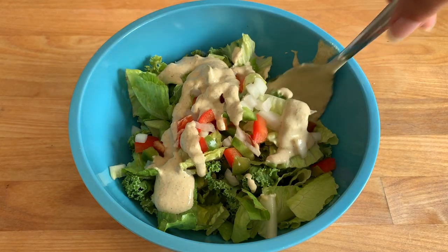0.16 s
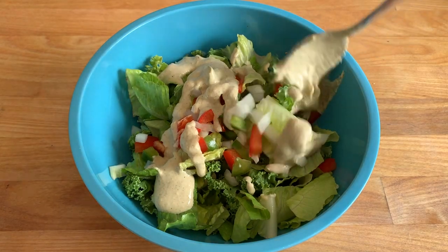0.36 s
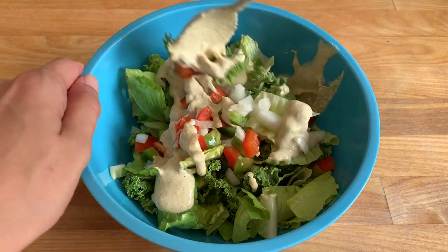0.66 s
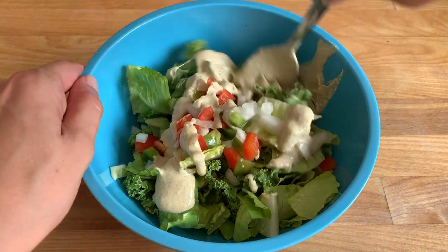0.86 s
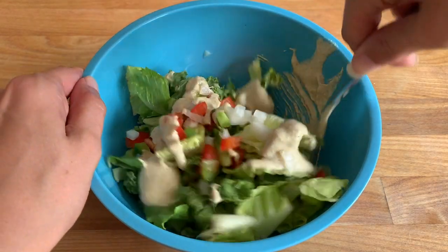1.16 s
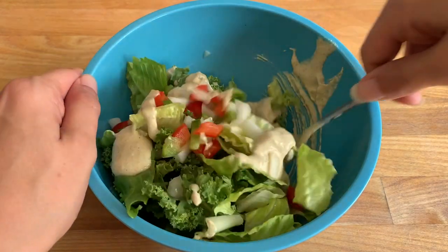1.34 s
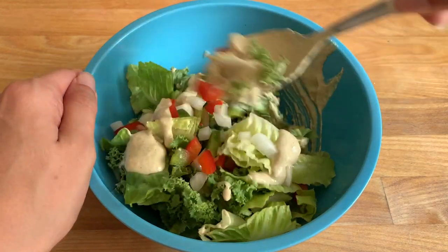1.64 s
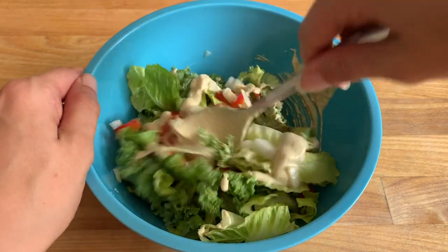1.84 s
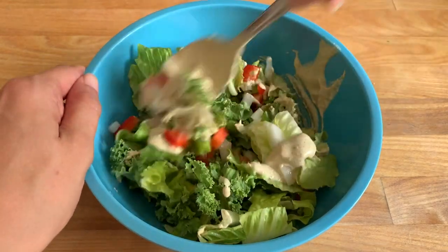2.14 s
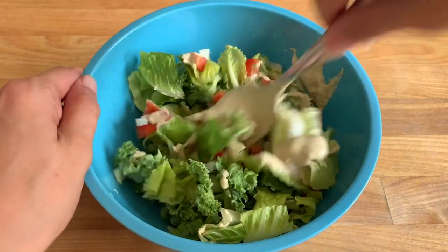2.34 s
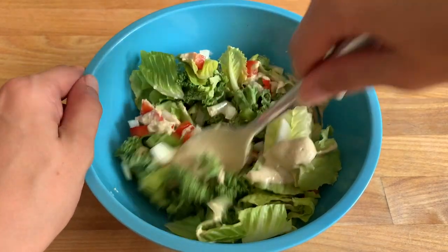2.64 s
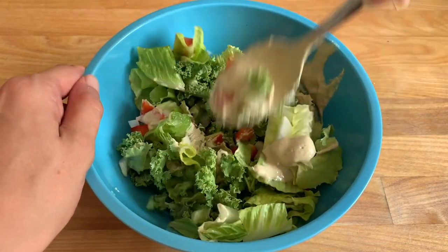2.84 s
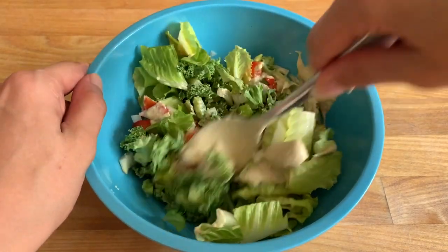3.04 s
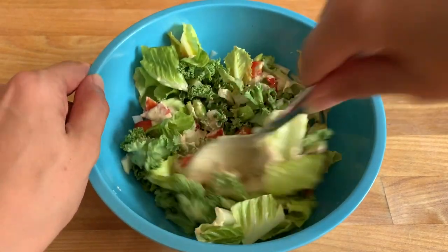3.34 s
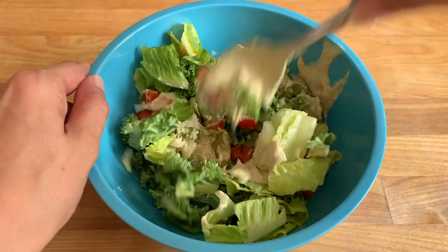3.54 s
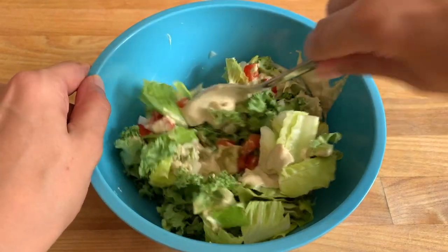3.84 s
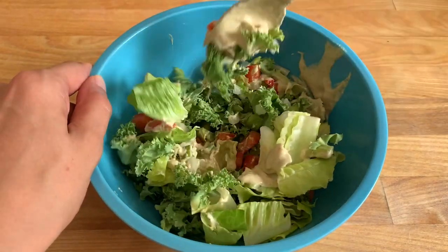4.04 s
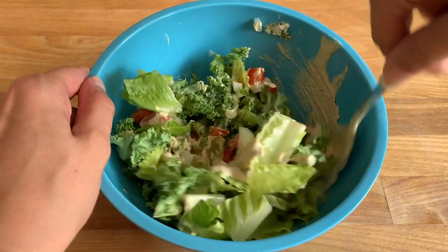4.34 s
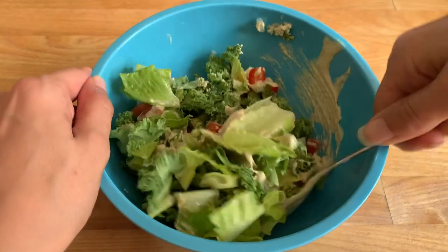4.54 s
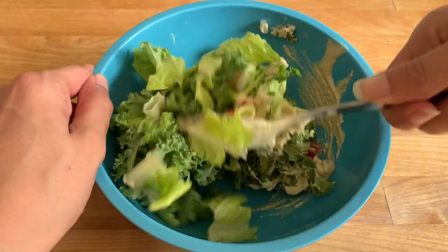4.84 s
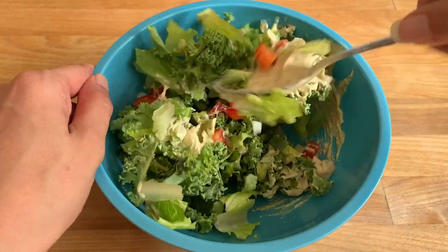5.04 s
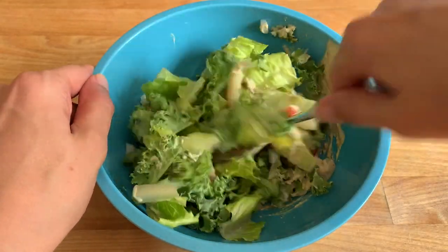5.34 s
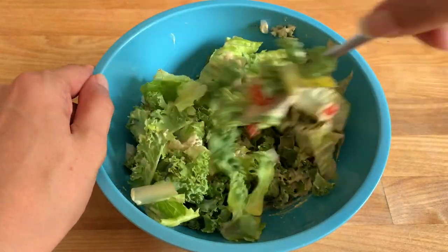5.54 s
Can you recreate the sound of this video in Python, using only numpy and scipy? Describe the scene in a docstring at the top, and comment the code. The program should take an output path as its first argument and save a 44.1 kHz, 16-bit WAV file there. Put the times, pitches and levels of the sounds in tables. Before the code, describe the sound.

After a soft, nearly still start, strokes of a metal utensil push wet leaves around a plastic bowl, each a crisp hiss that swells and stops quickly. Tiny squelches, dry snaps, short scrapes and hollow ticks accompany them. The bowl knocks woodenly on the counter, then hard clacks cut through late. Two close microphones capture it in a small quiet indoor room with low hum.

```python
"""A low thump of a wooden counter and faint taps of metal come first, then the hiss of stirred salad leaves.
Friction noise makes the hiss, short resonant bursts the snaps of stems and the pops of thick dressing.
A metal utensil scrapes and taps a plastic bowl, exciting its decaying modes, and drags out one brief squeak.
The bowl knocks on the wood and the counter thumps as damped oscillators; a quiet room hums behind.
Two closely placed microphone ports hear it all with a small phase lag."""
import sys
import numpy as np
from scipy import signal
from scipy.fft import rfft, irfft, next_fast_len
from scipy.io import wavfile
from scipy.ndimage import uniform_filter1d

SR = 44100
rng = np.random.default_rng(int(sys.argv[2]) if len(sys.argv) > 2 else 0)


def dump(signal):
    """Clip the signal to [-1, 1] and save it as 16-bit WAV at the path in sys.argv[1]."""
    limited = np.clip(np.atleast_2d(signal).T, -1, 1)
    pcm = np.round(limited * 32767).astype(np.int16)
    wavfile.write(sys.argv[1], SR, pcm)


N = 250973

# Strokes through the leaves: peak t/s, rise time/s, peak level/dB, hold time/s,
# level at the end of the hold/dB, dullness/dB (extra level below about 3 kHz)
STIR_STROKES = [(0.026, 0.034, -43.5, 0.029, -55, 8), (0.092, 0.068, -50.5, 0.073, -53, 7),
                (0.203, 0.092, -43.5, 0.097, -52, 0.5), (0.334, 0.1, -40.5, 0.013, -51, 0),
                (0.453, 0.18, -41.5, 0.061, -46, 4.5), (0.598, 0.098, -41, 0.18, -50, 3.5),
                (0.805, 0.086, -29.5, 0.39, -34, -0.5), (1.207, 0.19, -26.5, 0.093, -29, -5),
                (1.416, 0.16, -37.5, 0.21, -41.5, 0), (1.881, 0.11, -25, 0.18, -35, -0.5),
                (2.163, 0.11, -47.5, 0.037, -54, 7), (2.293, 0.11, -26, 0.13, -35.5, -1.5),
                (2.51, 0.06, -52, 0.038, -58, 7), (2.638, 0.12, -27.5, 0.13, -32.5, -2),
                (2.88, 0.065, -57.5, 0.07, -56, 22), (3.018, 0.14, -26.5, 0.17, -37.5, -2.5),
                (3.38, 0.09, -25.5, 0.13, -30.5, -2.5), (3.794, 0.076, -23, 0.24, -38.5, -2.5),
                (4.179, 0.052, -35.5, 0.29, -32.5, -0.5), (4.547, 0.049, -25, 0.091, -41.5, 6.5),
                (4.66, 0.064, -36, 0.22, -42, 3.5), (4.914, 0.033, -37, 0.072, -38.5, 2),
                (5.016, 0.012, -22, 0.19, -47, -3.5), (5.204, 0.086, -44.5, 0.075, -35.5, 3),
                (5.325, 0.1, -22.5, 0.16, -39.5, -0.5), (5.585, 0.11, -49.5, 0.079, -50.5, 12)]
# Spectrum of the leaf friction: f/Hz, relative density level/dB per Hz
LEAF_SPECTRUM = [(300, -43), (700, -22.5), (1400, 2.5), (2500, -4), (3800, 2.5), (6000, 4.5), (7500, -3),
                 (9500, -0.5), (15000, -4.5)]
# Snaps of stems and dressing: t/s, peak level/dB, centre f/Hz, t60/ms
STEM_SNAPS = [(0.1853, -25.5, 3700, 10), (0.293, -31.5, 6000, 8.6), (.6265, -30.5, 6400, 8),
              (.7783, -27, 7960, 14), (.8004, -34, 5860, 11), (.83, -26, 4470, 6), (.856, -16.5, 3850, 14),
              (.884, -18, 5000, 18), (.904, -23, 6500, 7), (.921, -21, 4000, 11), (.933, -29, 4500, 7.3),
              (1.037, -13.5, 8900, 9.7), (1.079, -30, 6000, 7.2), (1.1044, -18, 9050, 8),
              (1.1837, -24, 5200, 13), (1.408, -19.5, 5860, 19), (1.713, -38, 3750, 47),
              (1.952, -29, 6000, 9), (2.2752, -17, 5340, 8), (2.5711, -32, 2980, 11),
              (2.6489, -14, 6100, 9), (2.6923, -18, 6100, 11), (2.8773, -30, 5260, 19),
              (3.0006, -15, 6500, 14), (3.3737, -33, 6000, 9), (3.388, -30, 6000, 7.4),
              (3.774, -19, 5940, 9.2), (3.887, -13, 9050, 6.5), (3.9466, -14, 9500, 15),
              (4.1679, -24, 9800, 7.5), (4.2497, -25, 3500, 14), (4.2906, -18.5, 3560, 20),
              (4.3582, -6, 10000, 6), (4.3584, -5.5, 4160, 13), (4.4278, -15.5, 5500, 20),
              (4.501, -21, 9400, 21), (4.531, -22, 5000, 25), (4.541, 4.5, 5300, 12),
              (4.707, -23, 4830, 18), (4.74, -19, 3470, 9), (4.808, -25, 5000, 7), (4.91, -21, 5330, 26),
              (5.0087, -3.5, 8700, 5.6), (5.331, -9.5, 7600, 8.9), (5.589, -30.5, 5300, 17),
              (5.656, -37, 9000, 9)]
# Modes of the bowl wall: f/Hz, relative level/dB, free t60/s
WALL_MODES = [(900, -20, 0.032), (970, -13.5, 0.013), (1420, -16, 0.015), (1875, -10, 0.021),
              (2006, -2, 0.033), (2120, -25, 0.048), (2276, -39, 0.057), (2460, -29, 0.011),
              (2820, -26, 0.02), (3484, -5.5, 0.014), (3585, -25, 0.04), (3750, -19, 0.046),
              (4240, -24.5, 0.034)]
# The metal edge drags along the wall: start t/s, length/s, level/dB, lift of the upper modes/dB
EDGE_SCRAPES = [(0, 0.061, -53, -2), (0.965, 0.053, -43, 2), (1.065, 0.073, -46, -3),
                (1.141, 0.022, -34.5, -1), (1.272, 0.0083, -25.5, 4.5), (1.383, 0.024, -42, -7),
                (1.863, 0.13, -41, 1), (2.3, 0.074, -46, -13), (2.672, 0.13, -42.5, -2.5),
                (3.48, 0.087, -50, 1), (3.856, 0.076, -39.5, 3), (4.447, 0.14, -42, -13),
                (4.813, 0.12, -43, -13), (5.303, 0.093, -37, 2)]
# Metal taps the wall: t/s, peak level/dB, main ring f/Hz, lift of the lower, side and upper modes/dB each,
# contact time/ms, ring length/share of the free t60
METAL_TAPS = [(0.024, -30.5, 2195, 16, 18, -9, 3.6, 0.86), (.048, -42, 2260, 8, 5, -3, 5.4, 1),
              (.088, -38, 1970, 12, 5, 8, 3.3, 1), (1.162, -22.5, 2000, 3, -4, -7, 2.2, 1),
              (1.192, -18, 2016, -5, -4, -10, 3.9, 0.91), (1.263, -17, 2170, 3, 5, 18, 2.8, 0.76),
              (1.270, -8, 2163, -7, 5, 11, 3.33, 0.62), (1.280, -12, 2150, 14, 5, 26, 1.65, 0.64),
              (1.291, -7.5, 2094, -2, 11, 8.5, 3.6, 0.57), (1.297, -13, 2200, 5, 5, 12, 2, .5),
              (1.307, -35, 2180, 5, 4, -4, 2.5, .8), (1.412, -25, 2010, -1, -1, -2, 2.4, 1),
              (1.559, -23.5, 1990, 3, -2, 3.5, 2, 1), (2.298, -24.5, 2010, -2, 8, 5, 2.2, 1),
              (2.707, -30, 1960, -2, 0, -2, 1.56, 0.88), (3.097, -21.5, 2030, 16, 17, -5, 2.1, 0.91),
              (3.3884, -16, 1965, 1, 9, -15, 1.4, 0.56), (3.5214, -23.5, 2020, -2, -3, -7, 2, 0.91),
              (3.84, -32, 1945, 0, -11, -13, 3.2, 1), (3.86, -17.5, 2090, -3, -2, 10, 2.5, 0.65),
              (3.885, -25, 1940, -6, -11, -3, 3.8, 1), (3.983, -28, 1990, 2, 1, -5, 4.3, 1),
              (4.427, -27.5, 2000, 11, 13, -1, 1.1, 0.87), (4.5412, -0.5, 2032, 2.5, 21.5, -13, 1.79, 0.61),
              (4.592, -24, 2024, 1, 3, -8, 4, 0.74), (4.74, -1, 2002, -6, 1, -8.5, 1.09, 1),
              (4.765, -11.5, 1973, -1, -9, -16, 1, 0.97), (4.778, -19, 1970, -5, -9, -14, 2.6, 1),
              (4.808, -24.5, 2010, 12, 18, -3, 1.6, 0.91), (4.8589, -21, 1974, 6, -7, -7, 2.1, 0.57),
              (5.312, -41, 2000, -3, 3, 10, 3.1, .7), (5.326, -21, 1940, 10, 0, 3, 2.5, 0.47),
              (5.372, -31, 1980, -5, 5, 12, 2.6, 0.49), (5.406, -23.5, 1940, -9, 0, -8, 3, .7),
              (5.503, -31.5, 2010, 2, 7, -1, 2, 1)]
# Metal on wet plastic: t/s, peak level/dB, start f/Hz, end f/Hz, length/s
WET_SQUEAK = (3.8505, -12, 11800, 10600, .0105)
# Modes of the bowl on the wood: f/Hz, relative level/dB, t60/s
BASE_MODES = [(206.7, 3.5, 0.028), (245.7, -8.5, 0.041), (295, -3, 0.029), (387, -2, 0.023),
              (490, -5, 0.024), (588, -12, .025), (703, -11, 0.029), (837, 0, 0.018), (954, -10.5, 0.023),
              (1044, -21.5, 0.032), (1330, -35, 0.039), (1376, -27.5, 0.028)]
# The bowl knocks on the wood: t/s, peak level/dB, favoured f/Hz, fall away from it/dB per octave squared,
# contact time/ms
BOWL_KNOCKS = [(.026, -39.5, 940, 14, 3.3), (0.665, -36, 800, 13, 1.8), (2.495, -16, 800, 11, 0.6),
               (2.707, -16, 345, 3.5, 2.6), (3.096, -2.5, 436, 1, 4.8), (3.486, -16.5, 400, 5.5, 0.97),
               (4.168, -6, 350, 6, 3.1), (4.196, -24, 300, 2, 3), (4.541, -8.5, 490, 10, 1),
               (5.007, -26.5, 490, 7, 2.4)]
# The counter thumps under the hands: t/s, peak level/dB, f/Hz, t60/ms
COUNTER_THUMPS = [(.004, -25, 54, 500), (0.362, -24, 90.3, 120), (0.385, -18, 74.3, 150),
                  (0.44, -26.5, 54.7, 300), (0.771, -37, 63, 250), (1.199, -31.5, 54, 240),
                  (1.649, -25, 49.6, 400), (2.1, -18.5, 52.4, 450), (2.693, -26, 48, 230),
                  (3.107, -25.5, 88, 530), (3.222, -22, 51.2, 360), (3.485, -27.5, 85, 190),
                  (3.879, -28, 53.2, 490), (4.174, -20.5, 90.2, 330), (4.562, -32, 60.4, 360),
                  (5.021, -24, 93, 140), (5.07, -32, 46, 170)]
# Spectrum of the room noise: f/Hz, relative density level/dB per Hz
ROOM_SPECTRUM = [(20, -43), (45, -4.5), (80, -5.5), (200, -3.5), (500, -8), (700, -20), (1300, -23),
                 (1800, -38), (5000, -47), (16000, -82)]
# Appliance tones: f/Hz, steady level/dB, waver bandwidth/Hz, waver level/dB
APPLIANCE_TONES = [(92.8, -46, 3.2, -57), (118.4, -46, 8.9, -67), (163.7, -49.5, 9.2, -42),
                   (289.8, -51, 18.5, -46.5)]
# Decay of the reflections: f/Hz, t60/s
ECHO_DECAY = [(200, 0.29), (600, 0.36), (1000, 0.29), (4000, 0.035), (12000, 0.095)]
# Phase between the ports: f/Hz, lead of the left/rad
PORT_LEAD = [(0, 0), (2000, .8), (3700, 1.6), (4750, 3.14), (8950, 9.42), (13200, 15.7), (17000, 21.3)]
# Level between the ports: f/Hz, left minus right level/dB
PORT_TILT = [(60, -.5), (300, -2), (800, -3), (1800, -1), (4000, 0)]

RISE_DB, PUSH_DB, PUSH_S = 57.5, 2.5, 0.01  # swell of a stroke; its first push and how fast that settles
RELEASE_DB_PER_S, SETTLE_DB, SETTLE_DB_PER_S = 247, -26, 117  # fast stop, then a faint slower settling
STILL_DB, STILL_DULL_DB = -71, 6  # rustle between strokes
SQUELCH_DB, BRUSH_DB = -11.5, -21.5  # pops and leaves brushing the wall, relative to the rustle
SNAP_WIDTH, SNAP_WIDENS_PER_DB = 1.3, 0.02  # bandwidth/centre f at 0 dB; softer snaps are narrower
GRIP_DB_PER_S, LET_GO_DB_PER_S = 423, 324  # onset and end of a scrape
MAIN_HZ, UPPER_HZ = 2000, 3100  # reference pitch of the main wall ring; lower bound of the upper modes in a tap
KNOCK_RISE_CYCLES, THUMP_RISE_MS = 1.7, 12
ROOM_DB = -41.5
EDGE_HZ = 15750  # band limit


def leaves():
    """Sliding friction: wet leaves give broadband hiss, which tiny crackles modulate; some strokes are duller."""
    def shape(hz, t):
        spectrum_db = read(LEAF_SPECTRUM, hz)
        if t is None:
            return spectrum_db
        return spectrum_db + stirring(t)[1] / (1 + (hz / 3000) ** 4)

    sizes = gain_of(5.5 * np.minimum(rng.exponential(1, N), 2.6))
    impulses = sizes * (rng.random(N) < 260 / SR)  # 260 per second on average
    decay = np.exp(-1 / (0.00093 * SR))  # time constant 0.93 ms
    crackle = signal.lfilter([1], [1, -decay], impulses)
    hiss = noise(shape, size=256, patchy_db=2.5, flicker_db=1.43) * (1 + 0.13 * crackle)
    return evened(hiss) * gain_of(slow(stirring)[0])


def stirring(t):
    """Friction noise follows motion: level and dullness in dB as strokes swell, push, hold, let go and settle."""
    s, rise, db, hold, end_db, dull_db = np.transpose(STIR_STROKES)[:, :, None]
    before = np.maximum(s - t, 0)
    since = np.maximum(t - s, 0)
    after = np.maximum(t - s - hold, 0)
    level = db - RISE_DB * (before / rise) ** 1.7
    level = level - PUSH_DB * (1 - np.exp(-since / PUSH_S))
    level = level + (end_db - db + PUSH_DB) * np.minimum(since / hold, 1)
    level = level + np.maximum(-RELEASE_DB_PER_S * after, SETTLE_DB - SETTLE_DB_PER_S * after)
    levels = np.vstack([np.maximum(level, -150), STILL_DB + 0 * t])
    return blend(levels, np.vstack([dull_db, [STILL_DULL_DB]]))


def squelches():
    """Impulsive excitation of resonators: dressing pulls apart in pitched pops that follow the rustle level."""
    sizes = gain_of(3.5 * np.minimum(rng.exponential(1, N), 3))
    impulses = sizes * (rng.random(N) < 500 / SR)  # 500 per second on average
    pitches = np.geomspace(1900, 11000, 16)
    which = rng.integers(0, len(pitches), N)
    pops = sum(evened(resonate(impulses * (which == k), hz, 0.11 * hz)) for k, hz in enumerate(pitches))
    return evened(pops) * gain_of(slow(stirring)[0] + SQUELCH_DB)


def snaps():
    """Sudden release: each snap is a decaying noise burst around one pitch, without bass."""
    out, t = np.zeros(N), np.arange(2048) / SR
    draws = rng.standard_normal((len(STEM_SNAPS), 2048))
    for (s, db, hz, t60_ms), draw in zip(STEM_SNAPS, draws):
        width = hz * max(SNAP_WIDTH + SNAP_WIDENS_PER_DB * db, 0.3)
        band = resonate(resonate(draw, hz, width), hz, width)
        no_bass = signal.butter(3, 0.35 * hz, "highpass", fs=SR, output="sos")
        burst = signal.sosfilt(no_bass, band)
        attack = np.minimum(t / 0.00028, 1)
        decay = gain_of(-60 * 1000 * t / t60_ms)
        add(out, s - 0.0004, peaked(burst * attack * decay, db))
    return out


def scrape():
    """Sustained modal excitation: uneven slips of the metal edge keep the bowl wall ringing."""
    db, upper_db = slow(dragging)
    unevenness = evened(uniform_filter1d(rng.standard_normal(N), size=500))
    slips = rng.standard_normal(N) * gain_of(4.2 * unevenness)
    modes = np.array([gain_of(d) * evened(resonate(slips, hz, 1.7 / t60)) for hz, d, t60 in WALL_MODES])
    upper = np.transpose(WALL_MODES)[0] > 1.05 * MAIN_HZ
    ringing = modes[~upper].sum(0) + modes[upper].sum(0) * gain_of(upper_db)
    return ringing * gain_of(db)


def dragging(t):
    """Drive level of the wall ring and lift of its upper modes in dB; moving leaves also brush the wall."""
    s, length, db, upper_db = np.transpose(EDGE_SCRAPES)[:, :, None]
    level = db - GRIP_DB_PER_S * np.maximum(s - t, 0)
    level = level - LET_GO_DB_PER_S * np.maximum(t - s - length, 0)
    levels = np.vstack([np.maximum(level, -150), stirring(t)[0] + BRUSH_DB])
    return blend(levels, np.vstack([upper_db, [0]]))


def taps():
    """Impact on a modal body: longer contacts swell in slower; pressure and leaves shift and damp the ring."""
    out = np.zeros(N)
    hz, mode_db, t60 = np.transpose(WALL_MODES)[:, :, None]
    lower = hz < 0.8 * MAIN_HZ
    upper = hz > UPPER_HZ
    side = ~upper & (hz > 1.12 * MAIN_HZ)
    main = ~(lower | side | upper)
    draws = rng.random((len(METAL_TAPS), len(WALL_MODES), 1))
    for tap, draw in zip(METAL_TAPS, draws):
        s, db, main_hz, lower_db, side_db, upper_db, contact_ms, share = tap
        contact = contact_ms / 1000
        lift_db = lower * lower_db + side * side_db + upper * upper_db
        tuned_hz = np.where(main, hz * main_hz / MAIN_HZ, hz)
        sound = ring(tuned_hz, mode_db + lift_db, t60 * max(share, 0.2), 0.6 * draw, contact)
        add(out, s - contact, peaked(sound, db))
    return out


def squeak():
    """Frequency glide: metal on wet plastic gives a brief falling whistle."""
    s, db, hz, end_hz, length = WET_SQUEAK
    count, out = round(length * SR), np.zeros(N)
    turns = np.cumsum(np.linspace(hz, end_hz, count)) / SR
    whistle = np.sin(2 * np.pi * turns) * signal.windows.tukey(count, 0.7)
    add(out, s, gain_of(db) * whistle)
    return out


def knocks():
    """Damped modes of a loaded bowl rocking onto wood: the spot hit favours some, the lowest swell in last."""
    out = np.zeros(N)
    mode_hz, mode_db, t60 = np.transpose(BASE_MODES)[:, :, None]
    draws = rng.random((len(BOWL_KNOCKS), len(BASE_MODES), 1))
    for (s, db, hz, fall_db, contact_ms), phases in zip(BOWL_KNOCKS, draws):
        favoured_db = mode_db - abs(fall_db) * np.log2(mode_hz / hz) ** 2
        rise = contact_ms / 1000 + KNOCK_RISE_CYCLES / mode_hz
        add(out, s, peaked(ring(mode_hz, favoured_db, t60, 0.5 * phases, rise), db))
    return out


def thumps():
    """Flexural vibration: the counter gives two detuned, damped low swings."""
    out, t = np.zeros(N), np.arange(SR // 2) / SR
    swell = 1 - np.exp(-(1000 * t / THUMP_RISE_MS) ** 2)
    draws = rng.random((len(COUNTER_THUMPS), 2))
    for (s, db, hz, t60_ms), (phase, detune) in zip(COUNTER_THUMPS, draws):
        second_hz = hz * (1.183 + 0.33 * detune)
        swing = np.sin(2 * np.pi * hz * t) + 0.47 * np.sin(2 * np.pi * (second_hz * t + phase))
        add(out, s, peaked(swing * swell * gain_of(-60 * 1000 * t / t60_ms), db))
    return out


def room():
    """Ambient noise: rumble and hiss under tones that each sum a steady sine and narrow-band noise."""
    t, hum = np.arange(N) / SR, np.zeros(N)
    for hz, db, width, waver_db in APPLIANCE_TONES:
        hum += gain_of(db) * np.sqrt(2) * np.sin(2 * np.pi * (hz * t + rng.random()))
        hum += gain_of(waver_db) * evened(resonate(rng.standard_normal(N), hz, width))
    air = noise(lambda hz, t: read(ROOM_SPECTRUM, hz), size=2048, patchy_db=2.0, flicker_db=1.34)
    return gain_of(ROOM_DB) * evened(air) + hum


def echo(x):
    """Reverberation: sparse reflections of random sign, decaying at a rate that depends on frequency."""
    sparse = np.zeros(SR // 2)
    at = np.arange(200, SR // 2 - 20, 20) + rng.integers(0, 20, (SR // 2 - 201) // 20)
    sparse[at] = rng.choice([-1.0, 1.0], len(at))
    hz, t, spectra = signal.stft(sparse, SR, nperseg=256)
    decay = gain_of(-60 * t / read(ECHO_DECAY, hz)[:, None])
    tail = signal.istft(spectra * decay, SR, nperseg=256)[1]
    return signal.fftconvolve(x, tail / np.linalg.norm(tail))[:N]


def ports(x):
    """Interaural-style cues: the right port lags in phase, most in the treble, with slightly louder low mids."""
    size = next_fast_len(N + 4096)
    hz = np.fft.rfftfreq(size, 1 / SR)
    lead = np.interp(hz, *np.transpose(PORT_LEAD))
    half = np.exp(0.5j * lead) * gain_of(read(PORT_TILT, hz) / 2)  # the ports share each difference equally
    return irfft(rfft(x, size) * np.array([half, 1 / half]), size)[:, :N]


def noise(db_of, size, patchy_db, flicker_db):
    """Short-time spectral synthesis: random spectra of level db_of(Hz, s), blotchy, with a shared flicker."""
    frames, hz = 4 * N // size + 5, np.fft.rfftfreq(size, 1 / SR)
    real, imaginary, patches = rng.standard_normal((frames, len(hz), 3)).T
    patches = uniform_filter1d(patches, size=5, axis=0)
    patches = evened(uniform_filter1d(patches, size=7, axis=1))
    flicker = evened(uniform_filter1d(rng.standard_normal(frames), size=3))
    db = db_of(hz[:, None], np.arange(frames) * size / 4 / SR)
    db = db + patchy_db * patches + flicker_db * flicker
    total_power = np.sum(gain_of(2 * db_of(hz, None)))
    spectra = (real + 1j * imaginary) * gain_of(db) / np.sqrt(total_power)
    return signal.istft(spectra, nperseg=size, noverlap=3 * size // 4)[1][:N]


def resonate(x, hz, width):
    """Single-pole resonance: a band of the given width in Hz, with gain near 1 at its centre."""
    pole = np.exp((2j * np.pi * hz - np.pi * width) / SR)
    return 2 * signal.lfilter([1 - abs(pole)], [1, -pole], x).real


def ring(hz, db, t60, phases, rise):
    """Modal superposition: exponentially decaying sines that swell in over rise seconds; phases in turns."""
    t = np.arange(SR // 6) / SR
    swell = 1 - np.exp(-(t / rise) ** 2)
    decay = gain_of(db - 60 * t / t60)
    return np.sum(swell * decay * np.sin(2 * np.pi * (hz * t + phases)), axis=0)


def blend(db, colour_db):
    """Incoherent addition: overlapping events add by power, which also weights the mean colour."""
    power = gain_of(2 * db)
    total = power.sum(0)
    return 10 * np.log10(total), (power * colour_db).sum(0) / total


def slow(control):
    """Linear interpolation of a slow control computed every 2 ms."""
    t = np.arange(0, N / SR + 0.002, 0.002)
    return [np.interp(np.arange(N) / SR, t, v) for v in control(t)]


def gain_of(db):
    """Amplitude ratio of a level in dB."""
    return 10 ** (np.asarray(db) / 20)


def evened(x):
    """Normalization to unit root mean square."""
    return x / np.sqrt(np.mean(x ** 2) + 1e-20)


def peaked(x, db):
    """Normalization to a peak level in dB."""
    return gain_of(db) * x / np.abs(x).max()


def read(points, hz):
    """Interpolation of a curve along logarithmic frequency."""
    f, value = np.transpose(points)
    return np.interp(np.log(hz + 1), np.log(f + 1), value)


def add(mix, s, sound):
    """Linear superposition of a sound onto the mix from s seconds on."""
    part = mix[round(s * SR):][:len(sound)]
    part += sound[:len(part)]


def scene():
    """Superposition of direct and reflected sound; a diffuse part differs between the ports in the mids."""
    knock = knocks()
    bowl = leaves() + squelches() + scrape() + taps() + snaps() + squeak()
    near = bowl + knock + thumps() + room()
    near = near + gain_of(-13.5) * echo(bowl) + gain_of(-14.5) * echo(knock)
    loose = gain_of(-19.0) * echo(bowl) + gain_of(-14.5) * echo(knock)
    loose = loose + gain_of(-6.0) * knock + gain_of(-1.5) * room()
    mids = signal.butter(2, [450, 2500], "bandpass", fs=SR, output="sos")
    loose = signal.sosfilt(mids, loose)
    return ports(near) + loose * np.array([[-0.6], [1]])  # opposite signs at the two ports


def record(dry):
    """Amplitude limiting, then band limiting: peaks beyond full scale clip before a lowpass."""
    lowpass = signal.firwin(511, EDGE_HZ, window=("kaiser", 9), fs=SR)
    return signal.oaconvolve(np.clip(dry, -1, 1), lowpass[None], "same")


dry = scene()
out = record(dry)
dump(out)
```